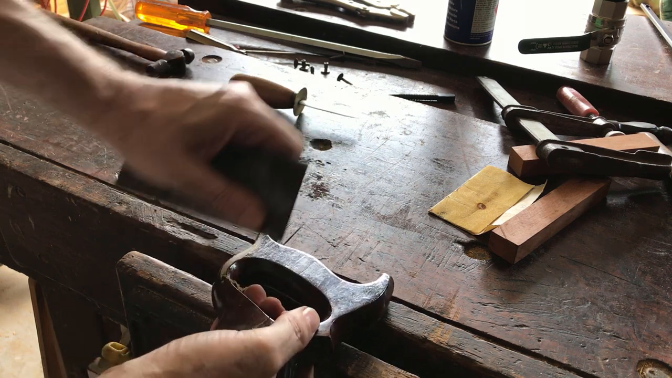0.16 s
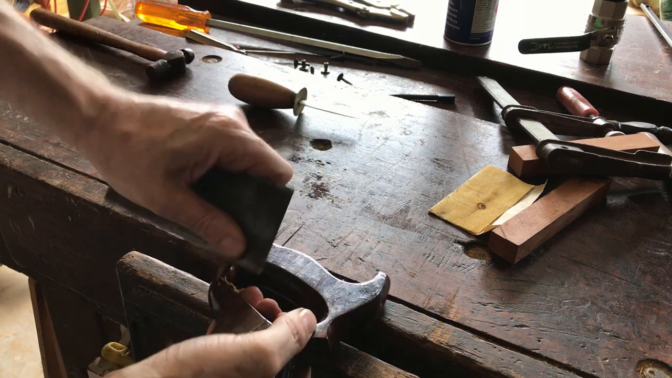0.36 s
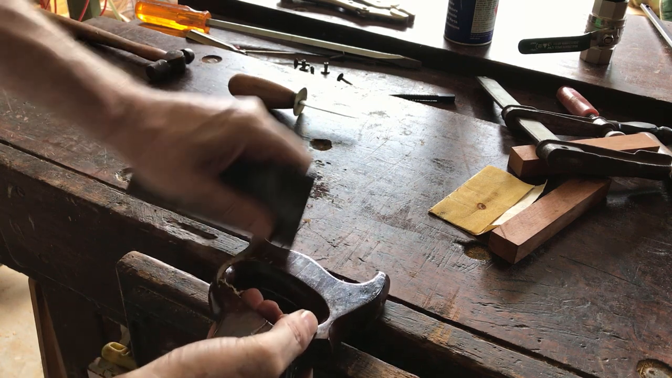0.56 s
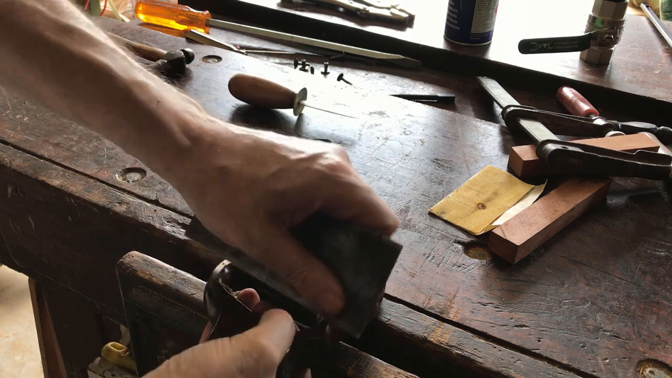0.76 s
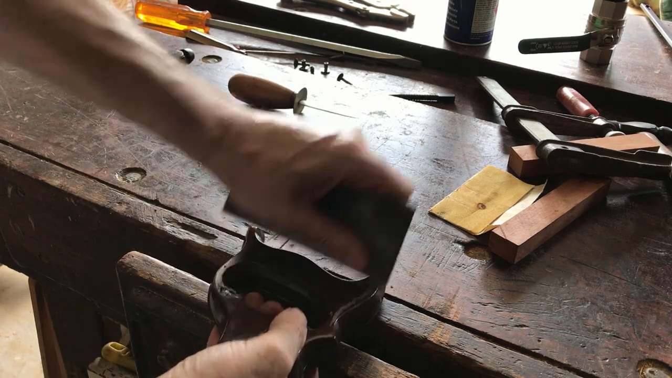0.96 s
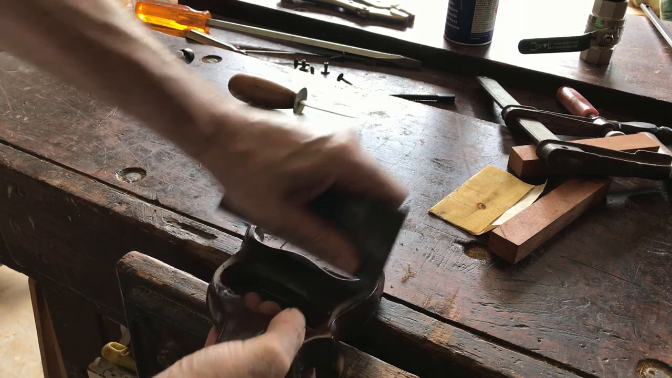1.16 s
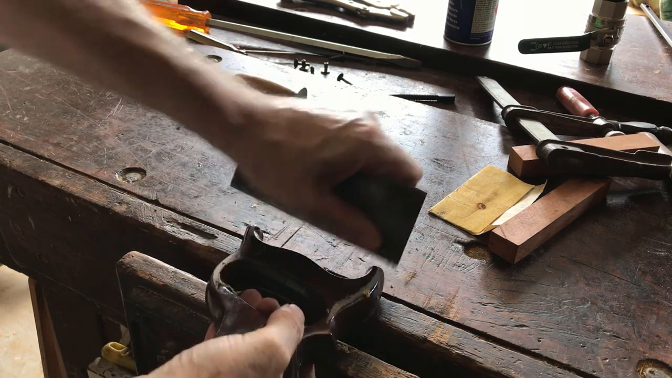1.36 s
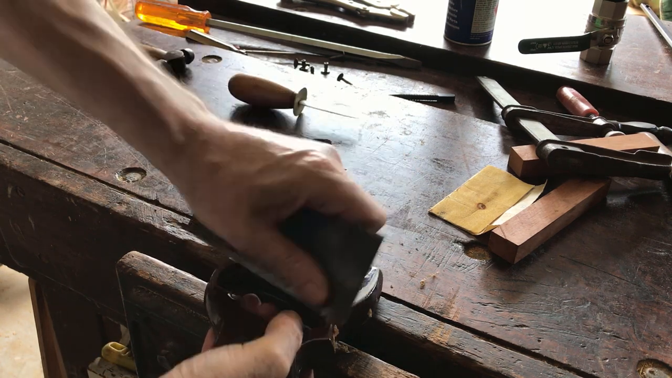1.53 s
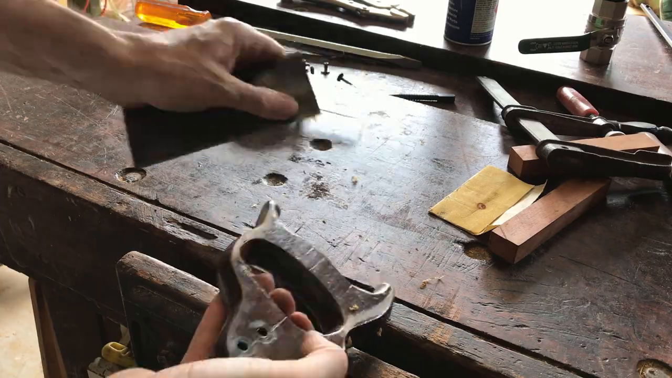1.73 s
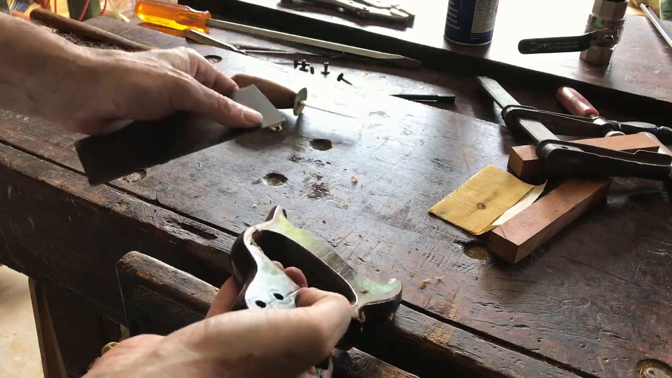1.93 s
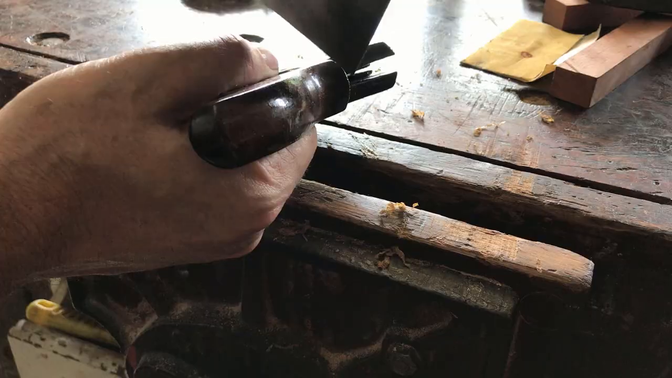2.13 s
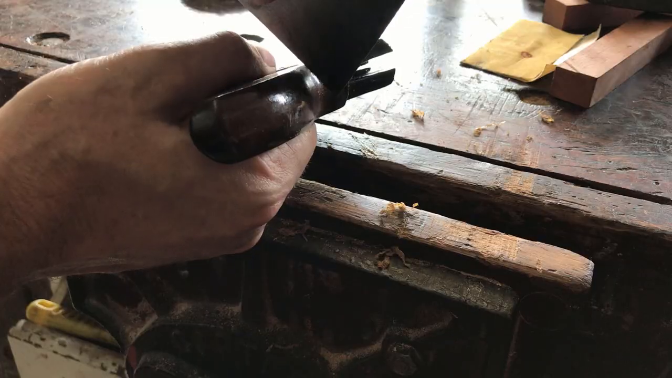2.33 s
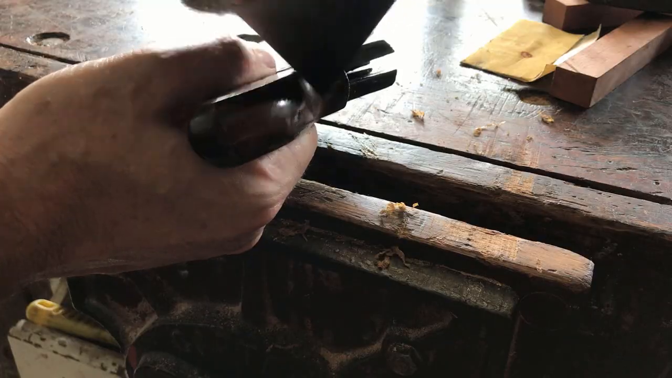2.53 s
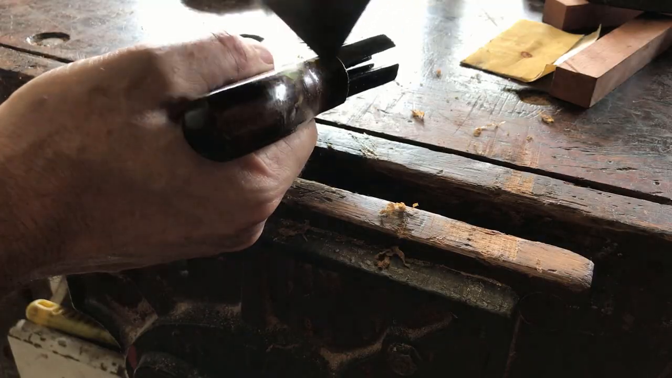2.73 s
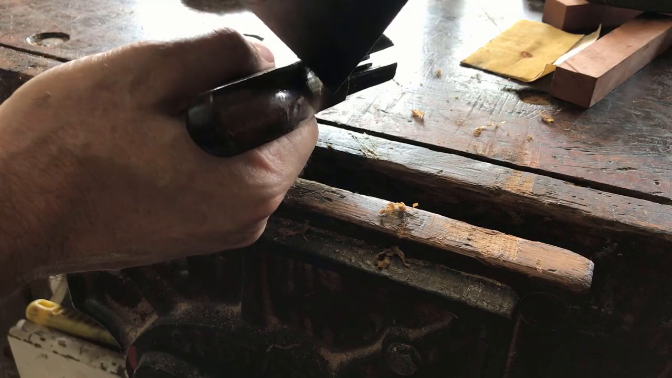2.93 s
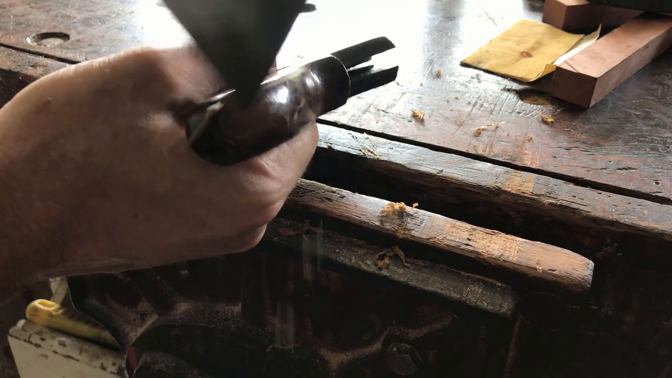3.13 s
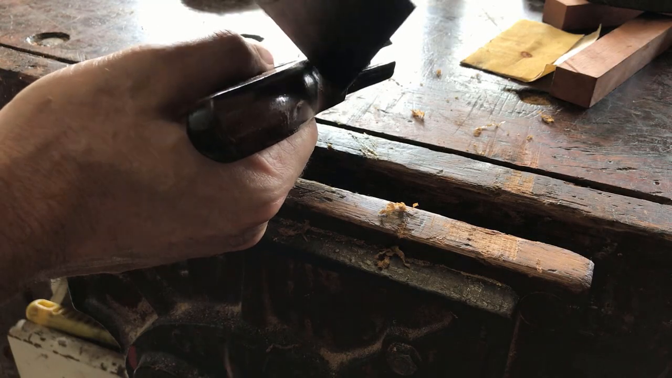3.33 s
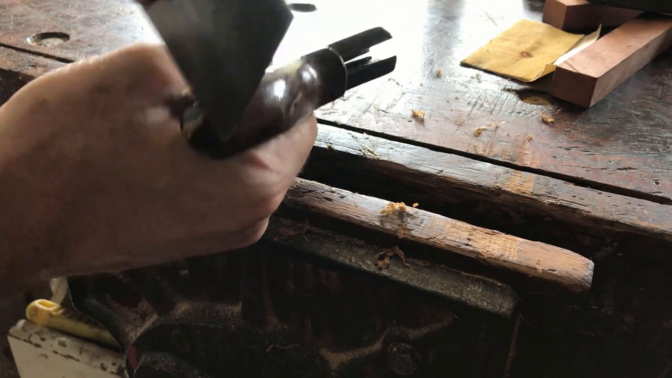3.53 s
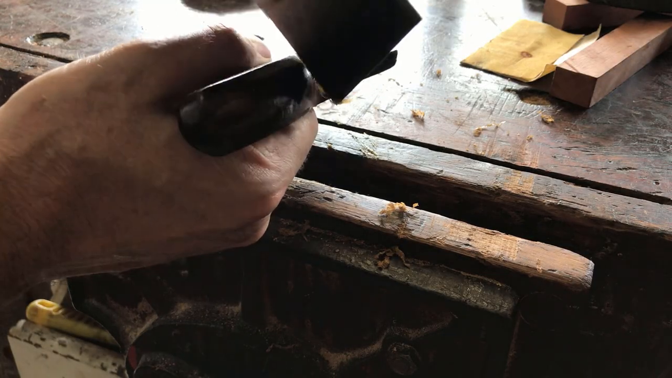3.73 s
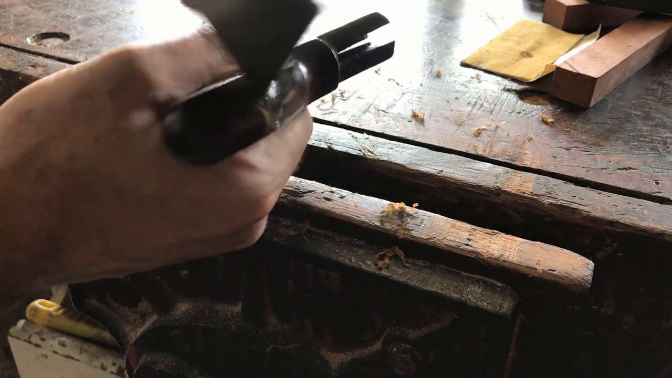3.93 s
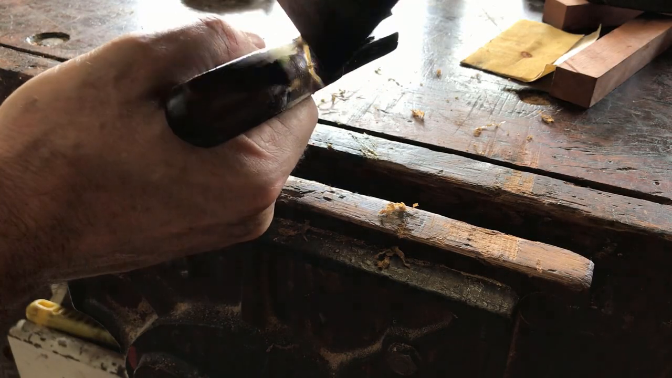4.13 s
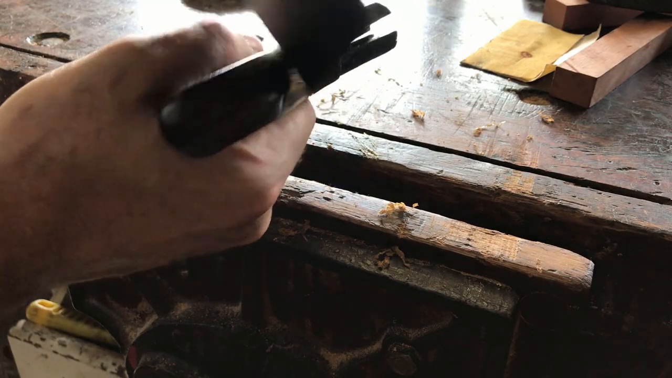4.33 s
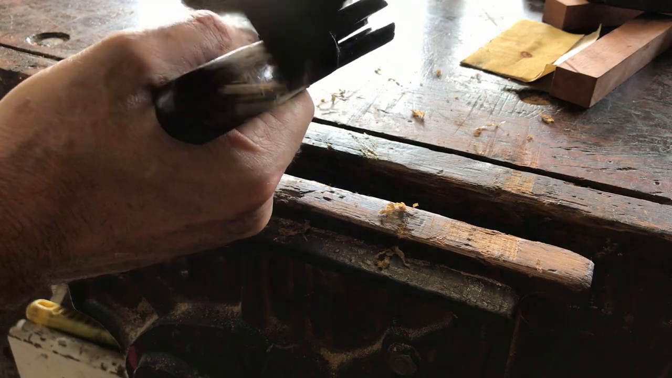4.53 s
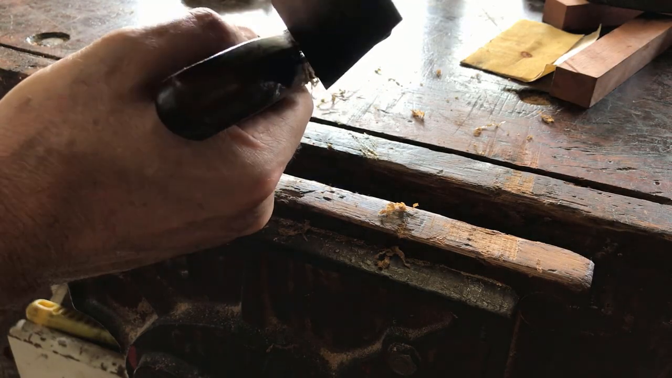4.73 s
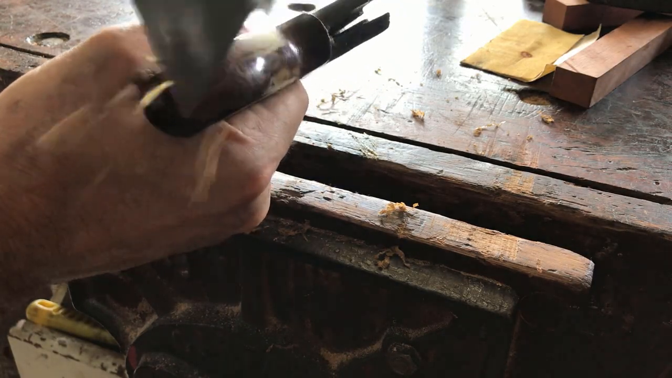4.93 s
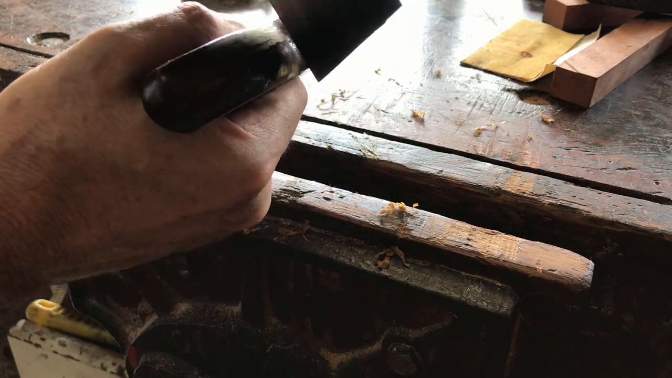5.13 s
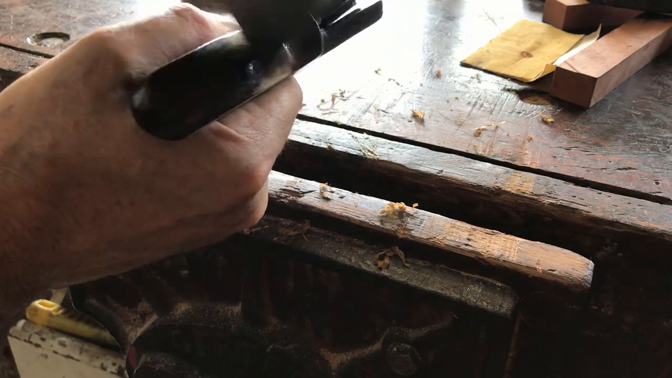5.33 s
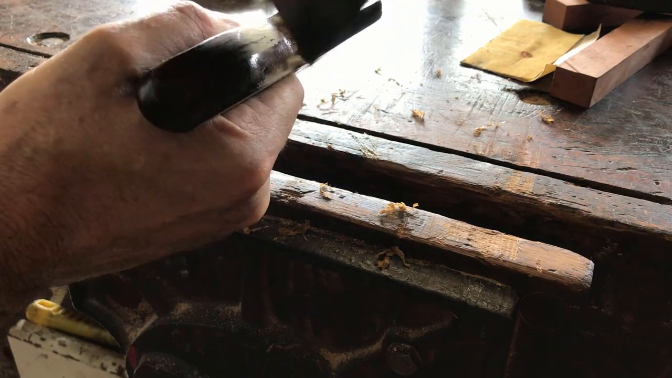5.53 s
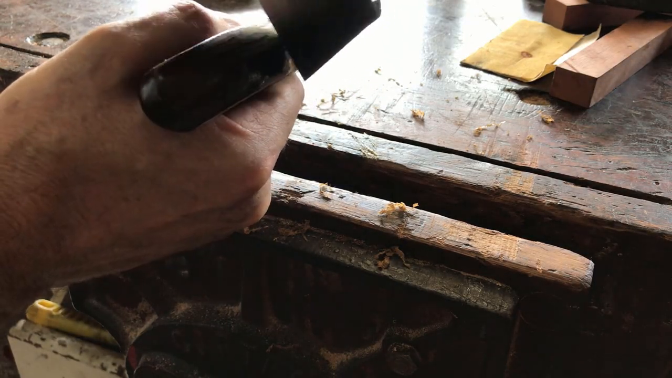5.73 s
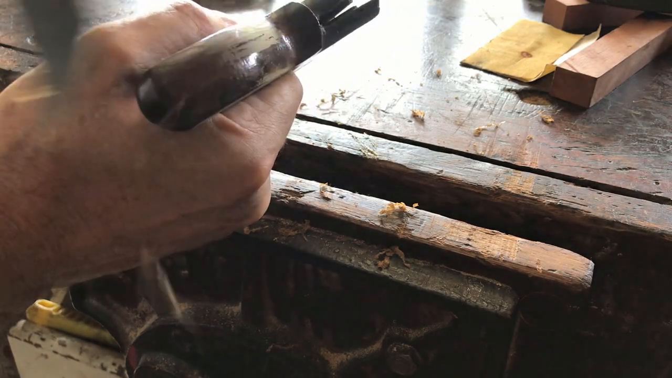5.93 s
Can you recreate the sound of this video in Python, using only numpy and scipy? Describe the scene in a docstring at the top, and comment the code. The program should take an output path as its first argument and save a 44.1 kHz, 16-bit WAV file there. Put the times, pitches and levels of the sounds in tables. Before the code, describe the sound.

A thin steel blade scrapes a hard wooden handle in a rapid run of light, ticking strokes, heard from close by. The work stops briefly and a piercing crackle sounds on the right. Then firmer, slower strokes follow about twice a second, each starting with a soft knock and tearing off a shaving with a gritty, ringing rasp. The small workshop adds a low rumble and a faint whine.

```python
"""Quick flicks of a steel card scraper on a wooden saw handle, close up in a small workshop: each is
a tick of the landing edge and a short rasp. After a moment of silence and a crackle on the right
come eight long passes: the blade is set down, tears a shaving and drops off the end. Snapping
fibres and stick-slip friction shake its resonances. Behind it all, a low rumble and a faint whine."""
import sys
import numpy as np
from scipy import signal
from scipy.fft import rfft, irfft
from scipy.io import wavfile
from scipy.ndimage import uniform_filter1d

SR = 44100
rng = np.random.default_rng(int(sys.argv[2]) if len(sys.argv) > 2 else 0)


def digitize_waveform(pressure):
    """Quantize a signal to 16-bit integers and store it at the path in sys.argv[1].

    Rows of a 2-D input are taken as channels; values are limited to [-1, 1].
    """
    field = np.atleast_2d(pressure).T
    bounded = np.clip(field, -1, 1)
    quanta = np.round(bounded * 32767).astype(np.int16)
    wavfile.write(sys.argv[1], SR, quanta)


N = 268128
TIME = np.arange(N) / SR
HZ = np.fft.rfftfreq(4096, 1 / SR)
ONSET_DELAY_S = 0.0014  # each tick, knock and snag sounds this long after its listed time

# quick strokes: (landing [s], swing [s], lift-off [s], level [dB], skim re level [dB], treble [dB],
# tick level [dB], tick treble [dB])
FLICKS = [ (0.030, 0.026, 0.019, -25, -24, -5, -12, 14), (0.129, .028, 0.0095, -23.5, -16, -5.5, -14, -13),
          (0.229, 0.019, 0.014, -24.5, -15, -5.5, -16, 19),
          (0.317, 0.022, 0.016, -27, -10.5, -5, -17.5, -6),
          (0.409, 0.021, 0.015, -26, -12.5, -4.5, -15.5, 4), (0.504, 0.025, 0.014, -24, -20, -8, -16.5, 2),
          (0.592, 0.025, 0.012, -26.5, -17, -5.5, -21, -21), (0.875, 0.026, 0.015, -24.5, -8.5, -8, -29, 4),
          (0.981, 0.028, 0.02, -22.5, -28, -2.5, -15.5, 21),
          (1.089, 0.012, 0.03, -26.5, -12, -4, -10.5, 17), (1.188, .029, 0.011, -21, -24.5, -3, -16, -2),
          (1.275, 0.036, 0.0052, -22, -17.5, -4, -17.5, -10),
          (1.376, 0.021, 0.017, -23, -15, -3.5, -15, -6), (1.473, 0.019, 0.01, -21, -19, -3.5, -13.5, -2),
          (1.575, 0.028, 0.0062, -22, -19.5, -2.5, -13, -4),
          (2.083, 0.0037, 0.021, -42, -10, -33, -22, -25.5), ]
# firm strokes: (start [s], bite [s], draw [s], run-off [s], level [dB], swell [dB], hiss [dB],
# wood [dB], full-speed rasp [Hz], end bump [dB])
PASSES = [ (2.547, 0.031, 0.089, 0.027, -27.5, 5, -8.5, -13, 2800, -42),
          (2.660, 0.0065, .014, .017, -26.5, 10, -12, -7.5, 3170, -28),
          (2.979, 0.031, 0.12, 0.051, -25, 7.5, -8, -13.5, 3540, -26),
          (3.405, 0.019, 0.13, 0.048, -23.5, 10, -5, -16, 3420, -26.5),
          (3.894, 0.014, 0.094, .027, -25, 0.5, -3, -26, 3260, -31),
          (4.349, 0.0084, 0.1, 0.027, -22.5, 7.5, -4, -20, 4100, -22),
          (4.81, 0.01, .120, .023, -28, 3.5, 1.5, -22, 4180, -32.5),
          (5.291, 0.021, 0.11, 0.034, -23.5, 9, -1.5, -20, 4500, -36),
          (5.816, 0.031, .078, .017, -24.5, 7, 2, -22, 4700, -22.5), ]


def amp(db):
    return 10 ** (np.asarray(db) / 20)


def unit_rms(x):
    return x / np.sqrt(np.mean(x ** 2) + 1e-20)


def read(points, hz):
    """Interpolates a table on a log-frequency axis."""
    f, value = np.transpose(points)
    return np.interp(np.log(hz + 1), np.log(f + 1), value)


def add(mix, start_s, sound):
    part = mix[round(start_s * SR):][:len(sound)]
    part += sound[:len(part)]


def ramp(t, length_s):
    return np.clip(t / length_s, 0, 1)


def above(hz, order=8):
    """Power share above a crossover, on HZ."""
    return 1 / (1 + (hz / (HZ + 1)) ** order)


def noise(gain_at):
    """Noise of rms 1, shaped by gain_at(Hz)."""
    return unit_rms(irfft(rfft(rng.standard_normal(N)) * gain_at(np.fft.rfftfreq(N, 1 / SR)), N))


def wander(hz):
    """Random motion of rms 1, up to about hz."""
    return noise(lambda f: np.exp(-(f / hz) ** 2))


def impulse_response(gain):
    """Minimum-phase response of a body with this gain on HZ."""
    cepstrum = irfft(np.log(np.maximum(gain / gain.max(), 1e-5)))
    half = len(cepstrum) // 2
    causal = 2 * cepstrum[:half] * (np.arange(half) > 0)
    return irfft(np.exp(rfft(causal, 2 * half)))[:half]


def through(drive, gain):
    """A drive heard through a body, at rms 1."""
    return unit_rms(signal.oaconvolve(drive, impulse_response(gain))[:N])


def background(colour, hum, air_db, whine_hz, width_hz, whine_db):
    """Room air and rumble, faint wavering tones and a narrow band of high hiss."""
    air = amp(air_db) * noise(lambda f: amp(read(colour, f)))
    wavering_s = np.cumsum(1 + 0.0014 * wander(2.5)) / SR
    tones = sum(amp(db) * np.sqrt(2) * np.sin(2 * np.pi * hz * wavering_s) for hz, db in hum)
    whine = amp(whine_db) * noise(lambda f: np.exp(-((f - whine_hz) / (2 * width_hz)) ** 2))
    return air + tones + whine


def blow(gain, decay_s, grit, count=2048):
    """A push and a fast-dying crunch into a body; peak near 1."""
    t = np.arange(count) / SR
    drive = (t == 0) + grit * rng.standard_normal(count) * np.exp(-t / decay_s)
    sound = signal.fftconvolve(drive, impulse_response(gain))[:count]
    return sound / np.sqrt(2 * uniform_filter1d(sound ** 2, size=44).max())


def ticks(level_db=-1, low_ring_db=-2.5, catch_db=-6, catch_treble_db=10):
    """Steel meets hard wood: a bright crack and brief ring as each flick lands, and as it catches."""
    # stray touches and hard catches: (time [s], level [dB], treble [dB])
    strays = [(0.53, -11, 21), (0.804, -28.5, -4), (0.849, -29, -8), (1.048, -23.5, -3), (1.122, -15.5, 0)]
    # crack spectrum: (frequency [Hz], level [dB])
    colour = [(200, -37), (1040, -14.5), (1400, -12.5), (2170, -5.5), (3020, -9), (3690, -1), (5200, -11.5),
              (5800, -6), (7680, 7), (8900, -4.5), (11700, -5), (16000, -15)]
    # lightly held blade's modes: (frequency [Hz], level [dB], t60 [s])
    modes = [(1635, -22.5, 0.1), (2212, -20, 0.061), (3710, -46, 0.022), (6260, -9.5, 0.012),
             (7130, -46.5, 0.013)]
    landings = [(s, db, treble_db) for s, *_, db, treble_db in FLICKS]
    catches = [(s + swing_s, db + catch_db, catch_treble_db) for s, swing_s, _, db, *_ in FLICKS]
    out = np.zeros(N)
    for s, db, treble_db in landings + catches + strays:
        tick = blow(amp(read(colour, HZ) + treble_db * above(3100, order=2)), decay_s=0.00099, grit=0.36)
        t = np.arange(len(tick)) / SR
        for hz, mode_db, t60_s in modes:
            decay = amp(mode_db + low_ring_db * (hz < 3000) - 60 * t / t60_s)
            tick += decay * np.sin(2 * np.pi * hz * rng.uniform(1.0, 1.05) * t)
        add(out, s + ONSET_DELAY_S, amp(db + level_db) * tick)
    return out


def fibres(per_s, spread_db, friction):
    """Wood fibres snap one by one, a few loudly, over smooth friction noise."""
    size = amp(spread_db * np.minimum(rng.exponential(1, N), 4))
    snaps = size * rng.choice([-1, 1], N) * (rng.random(N) < per_s / SR)
    return unit_rms(unit_rms(snaps) + friction * rng.standard_normal(N))


def shifting(x, depth_db):
    """The contact point wanders, so each resonance comes and goes on its own."""
    z = signal.stft(x, SR, nperseg=512, noverlap=384)[2]
    patches = uniform_filter1d(rng.standard_normal(z.shape), 4, axis=0)
    patches = unit_rms(uniform_filter1d(patches, 18, axis=1))
    return unit_rms(signal.istft(z * amp(depth_db * patches), SR, nperseg=512, noverlap=384)[1][:N])


def contact(t, fade_s):
    """The edge bites and lets go within fade_s."""
    return np.clip(np.minimum(t - t[0], t[-1] - t) / fade_s, 0, 1)


def flicks(body_db=-3.5, lift_db=-7, settle_s=0.0033):
    """Light strokes skim, dig in and lift: a broad rasp, stuttering as the edge skips over the grain."""
    # rasp spectrum: (frequency [Hz], level [dB])
    spectrum = [(24, -44), (40, -1.5), (2770, 2.5), (5310, -0.5), (7730, 4), (14800, 1.5), (16000, -7)]
    chatter = amp(-0.5 * wander(400))
    colour, top = amp(read(spectrum, HZ)), above(7860)
    body = through(fibres(7000, spread_db=3.16, friction=0.87) * chatter, colour * np.sqrt(1 - top))
    body = shifting(body, depth_db=2.5)
    fizz = through(fibres(9000, spread_db=1.8, friction=0.15) * chatter, colour * np.sqrt(top))
    out = np.zeros(N)
    for s, swing_s, lift_s, db, skim_db, treble_db, *_ in FLICKS:
        at = np.arange(round((s + settle_s) * SR), round((s + swing_s + lift_s) * SR))
        t = TIME[at] - s
        skim = 1 - ramp(t, swing_s) ** 1.19
        lift = ramp(t - swing_s, lift_s)
        level = amp(db + skim_db * skim + lift_db * lift)
        treble = amp(treble_db - 2 * skim - 6 * lift)
        out[at] += level * contact(t, 0.00021) * (amp(body_db) * body[at] + treble * fizz[at])
    return out


def workshop(x, walls_db, bench_db, bench_t60_s=0.12, count=20000):
    """Adds quick bench scatter and weak wall reflections, each band dying at its own rate."""
    # wall decay: (frequency [Hz], t60 [s])
    wall_t60 = [(200, 1), (1000, 0.39), (3500, 0.32), (8000, 0.16), (15000, .2)]
    taps = rng.standard_normal((2, count)) * (rng.random((2, count)) < 4000 / SR) * (TIME[:count] > .002)
    bench = taps[0] * amp(-60 * TIME[:count] / bench_t60_s)
    hz, t, z = signal.stft(taps[1], SR, nperseg=256)
    walls = signal.istft(z * amp(-60 * t / read(wall_t60, hz)[:, None]), SR, nperseg=256)[1][:count]
    echoes = amp(bench_db) * bench / np.linalg.norm(bench) + amp(walls_db) * walls / np.linalg.norm(walls)
    return x + signal.fftconvolve(x, echoes)[:N]


def crackle(level_db=9, half=256):
    """Thin, piercing clicks that swell and die within a millisecond."""
    # clicks: (time [s], level [dB])
    clicks = [(2.1818, -15), (2.1846, 3), (2.1870, 2), (2.1907, 1), (2.1931, 0)]
    # click spectrum: (frequency [Hz], level [dB])
    colour = [(300, -24), (3000, -8), (5000, 1), (7000, -16), (8400, 24.5), (9200, 21), (10500, 22),
              (12500, 19.5), (15400, 19.5), (16000, 3.5)]
    click = np.roll(irfft(amp(read(colour, HZ))), half)[:2 * half]
    out = np.zeros(N)
    for s, db in clicks:
        add(out, s - half / SR, amp(db + level_db) * click / click.max())
    return out


def knocks():
    """The blade is set down on the hand-damped handle: a dull, short knock."""
    # set-downs: (time [s], level [dB], brightness [dB])
    set_downs = [(2.416, -36, -8), (2.911, -18, 6.5), (3.348, -21.5, -12.5), (3.804, -23, -6),
                 (4.279, -25.5, -1), (4.764, -26.5, -6), (5.258, -38.5, -65), (5.79, -21, 18)]
    # knock spectrum: (frequency [Hz], level [dB])
    colour = [(100, -22), (300, -7.5), (550, 4.5), (1100, 2), (2150, 2), (2650, -10), (3050, 2),
              (3700, -11), (4800, -19), (8000, -22.5), (16000, -30)]
    out = np.zeros(N)
    for s, db, bright_db in set_downs:
        gain = amp(read(colour, HZ) + bright_db * above(2340, order=2))
        add(out, s + ONSET_DELAY_S, amp(db) * blow(gain, decay_s=0.0035, grit=0.16))
    return out


def blade_gain(floor_db=-27):
    """The bent blade pressed on the handle: resonances over a weak broad response."""
    # resonances: (frequency [Hz], width [Hz], level [dB])
    modes = [(1010, 376, -6), (1615, 200, 2.5), (2220, 380, -1), (2390, 250, -3.5), (3090, 293, 2),
             (3543, 330, -1), (4120, 280, -1), (4510, 300, -4), (5480, 450, -2.5), (5780, 353, -1),
             (6460, 400, -2.5), (7170, 440, -7.5), (8070, 590, -11.5), (9730, 1170, -7.5),
             (10140, 310, -8.5), (12000, 1020, -4), (13130, 500, -8.5), (14500, 1300, -7.5),
             (15100, 650, -7.5)]
    power = sum(amp(db) ** 2 * .5 ** ((2 * (HZ - hz) / width_hz) ** 2) for hz, width_hz, db in modes)
    return np.sqrt(power + amp(floor_db) ** 2 * (1 + 9 * above(1100, order=2)))


def rasp(x, gain, centre_hz, lift_db=8, width_oct=0.39):
    """The faster the edge crosses the wood's pores, the higher the band it excites; level is kept."""
    hz, t, z = signal.stft(x, SR, nperseg=256)
    centre = np.interp(t * SR, np.arange(len(x)), centre_hz)
    offset_oct = np.log2((hz[:, None] + 1) / centre)
    hump = amp(lift_db * np.exp(-.5 * (offset_oct / width_oct) ** 2))
    power = np.interp(hz, HZ, gain)[:, None] ** 2
    makeup = np.sqrt(power.sum() / (power * hump ** 2).sum(0))
    return signal.istft(z * hump * makeup, SR, nperseg=256)[1][:len(x)]


def travel(x, progress):
    """As contact moves along the edge (progress 0 to 1), some resonances grow and others fade."""
    # colour drift: (frequency [Hz], change over one draw [dB])
    drift = [(1600, -2), (2400, 3), (3200, 0.5), (4500, 7), (5000, 11), (5600, -11), (6500, 6.5), (8000, 4),
             (9400, 4.5), (10200, 11), (11900, -11.5), (13100, 2.5), (13700, -6), (15000, 4)]
    hz, t, z = signal.stft(x, SR, nperseg=256)
    along = np.interp(t * SR, np.arange(len(x)), progress) - .5
    return signal.istft(z * amp(read(drift, hz)[:, None] * along), SR, nperseg=256)[1][:len(x)]


def passes(slow_hz=2750):
    """Firm strokes: stick and slip shake the blade, and the rasp climbs as the hand speeds up."""
    grip, slip = wander(56.6), wander(330)
    colour, mid, top = blade_gain(), above(1725), above(10000)
    steel = colour * np.sqrt(mid * (1 - top))
    ring_drive = fibres(6000, spread_db=3.5, friction=0.69) * amp(1.93 * grip + 0.69 * slip)
    ring = shifting(through(ring_drive, steel), depth_db=2.14)
    hiss_drive = fibres(8000, spread_db=0.89, friction=0.26) * amp(0.91 * grip + slip)
    hiss = shifting(through(hiss_drive, colour * np.sqrt(top)), depth_db=2.0)
    wood_drive = fibres(1500, spread_db=4.4, friction=0.15) * amp(grip + 2 * slip)
    wood = shifting(through(wood_drive, colour * np.sqrt(1 - mid)), depth_db=3.5)
    out = np.zeros(N)
    for s, bite_s, draw_s, off_s, db, swell_db, hiss_db, wood_db, fast_hz, _ in PASSES:
        at = np.arange(round(s * SR), round((s + draw_s + off_s) * SR))
        t = TIME[at] - s
        progress = ramp(t, draw_s)
        speed = progress ** 1.22
        bite, slow, off = 1 - ramp(t, bite_s), 1 - speed, ramp(t - draw_s, off_s)
        blade = rasp(ring[at], steel, slow_hz + (fast_hz - slow_hz) * speed ** 1.4)
        # run-off: the ring dies first, the hiss holds on, the wood keeps sounding
        stroke = (amp(-13.5 * bite - 14 * off) * blade
                  + amp(hiss_db - 15 * bite - 4 * slow - 19.5 * off ** 6.4) * hiss[at]
                  + amp(wood_db - 1 - 13 * bite + 5.7 * slow + 3.5 * off) * wood[at])
        out[at] += amp(db - swell_db * slow) * contact(t, 0.0017) * travel(stroke, progress)
    return out


def snags(level_db=-3, drop_lead_s=0.0069, drop_db_per_oct=-9):
    """A snag in the grain, or the drop off the end of a pass, briefly jolts the blade's resonances."""
    # snags: (time [s], level [dB], tilt [dB/octave])
    jolts = [(2.68, -22, -2), (3.099, -14, 6), (3.487, -17, 1.5), (3.945, -18, 4), (3.99, -24, -4),
             (4.416, -15, 7), (4.451, -14, 16), (5.408, -31, 4), (5.426, -17, -2.5), (5.895, -22, 4)]
    drops = [(s + draw_s + off_s - drop_lead_s, db, drop_db_per_oct)
             for s, _, draw_s, off_s, *_, db in PASSES]
    out = np.zeros(N)
    for s, db, db_per_oct in jolts + drops:
        gain = blade_gain() * amp(db_per_oct * np.log2(1 + HZ / 700))
        add(out, s + ONSET_DELAY_S, amp(db + level_db) * blow(gain, decay_s=0.0085, grit=0.87))
    return out


def scene(silence_from_s=2.134, silence_to_s=2.180):
    """Two spells of work, both centred; only the crackle is on the right."""
    # air spectrum in each spell: (frequency [Hz], level [dB])
    air_first = [(30, -38), (90, -25), (150, -1.5), (230, 0.5), (400, -9), (700, -10.5), (1500, -14),
                 (2200, -16), (5000, -18.5), (9000, -21.5), (12000, -23), (16000, -18.5)]
    air_later = [(15, -30.5), (35, -22.5), (52, 11.5), (68, 14.5), (85, 2.5), (125, 1), (200, -8),
                 (500, -11.5), (1200, -13.5), (2200, -19.5), (5000, -25.5), (11000, -18.5), (16000, -26)]
    # room tones in each spell: (frequency [Hz], level [dB])
    hum_first = [(145.3, -71.5), (258.4, -71), (366.1, -73)]
    hum_later = [(414.5, -77), (710.6, -78.5), (1066, -80)]
    first = workshop(flicks() + ticks(), walls_db=-34.5, bench_db=-14)
    first += background(air_first, hum_first, air_db=-59, whine_hz=15250, width_hz=650, whine_db=-59)
    later = workshop(passes() + knocks() + snags(), walls_db=-16, bench_db=-19)
    later += background(air_later, hum_later, air_db=-56.5, whine_hz=8700, width_hz=540, whine_db=-50)
    centre = first * (TIME < silence_from_s) + later * (TIME > silence_to_s)
    return np.array([centre, centre + crackle()])


def record(dry):
    """Full-scale clipping, then a low-pass."""
    low_pass = signal.firwin(401, cutoff=15950, window=("kaiser", 7), fs=SR)
    return signal.oaconvolve(np.clip(dry, -1, 1), low_pass[None], "same", axes=1)


dry = scene()
out = record(dry)
digitize_waveform(out)
```